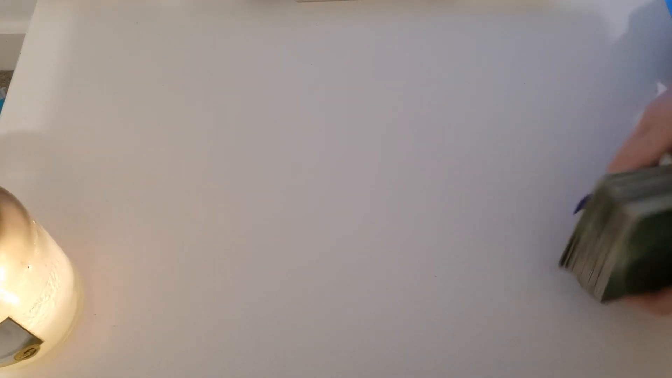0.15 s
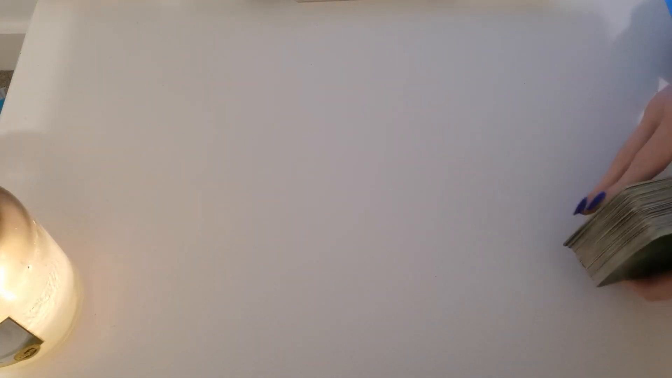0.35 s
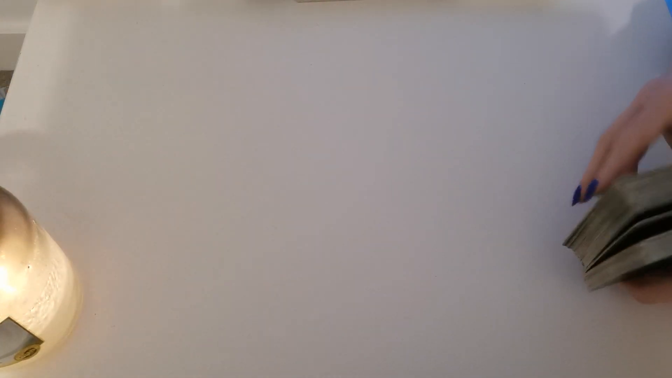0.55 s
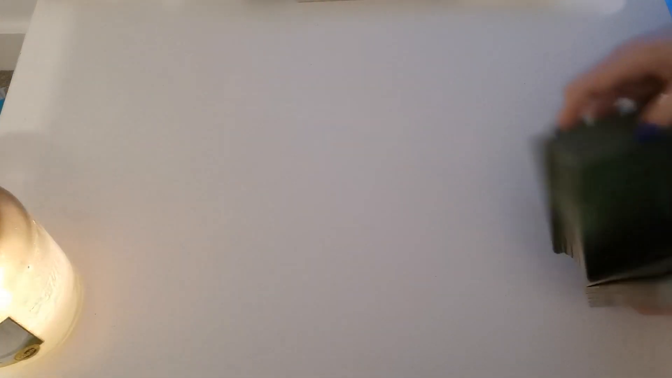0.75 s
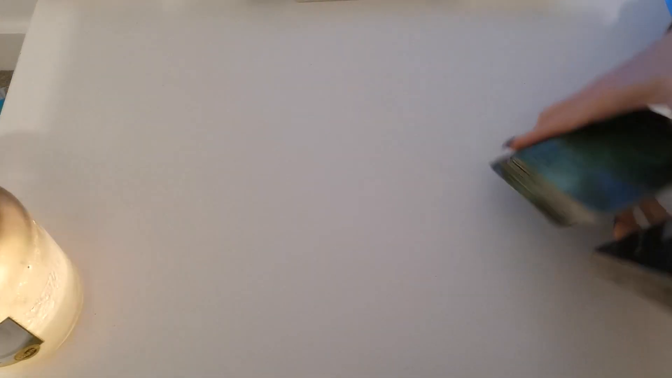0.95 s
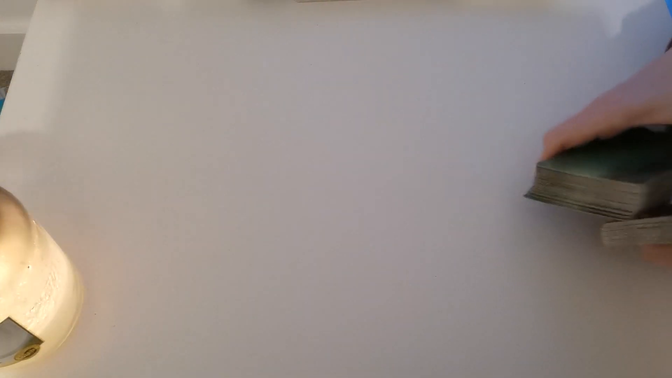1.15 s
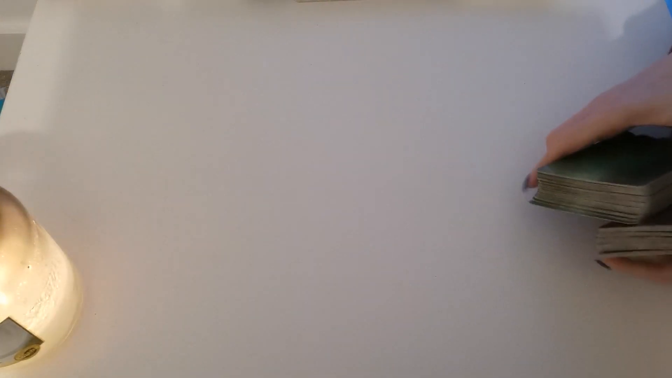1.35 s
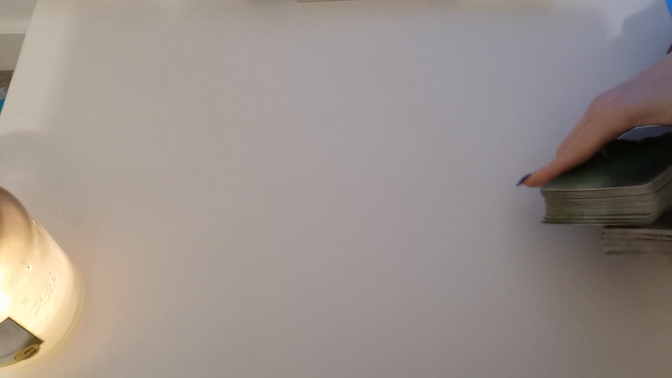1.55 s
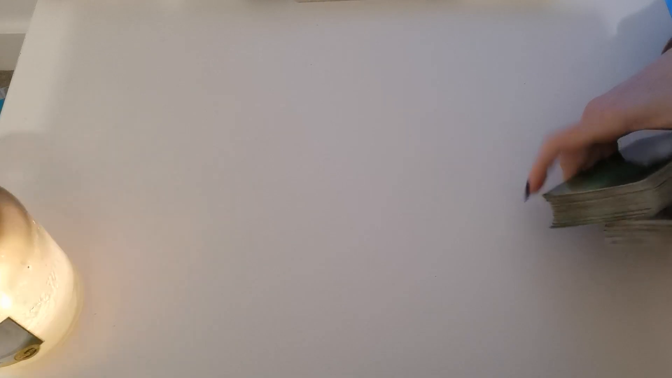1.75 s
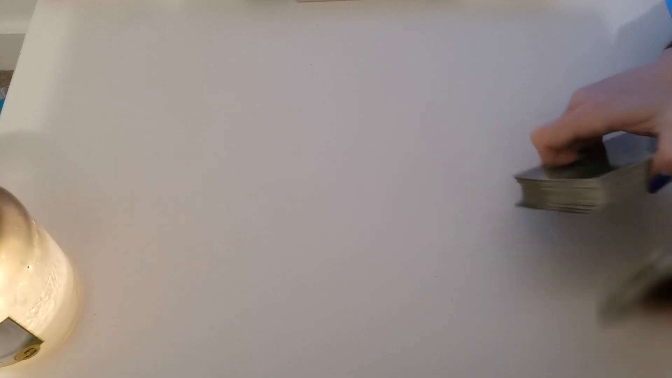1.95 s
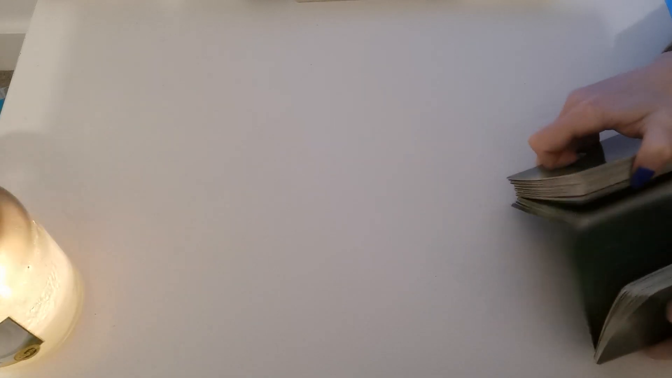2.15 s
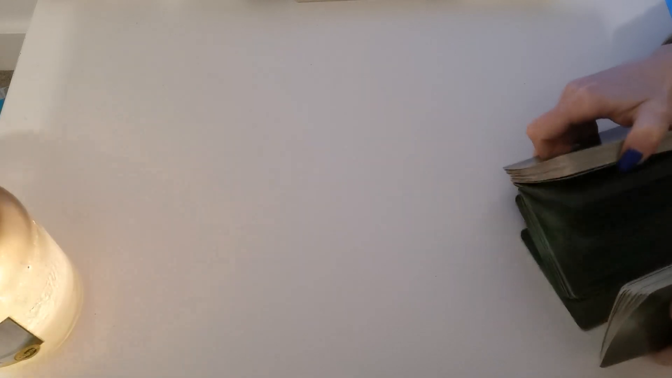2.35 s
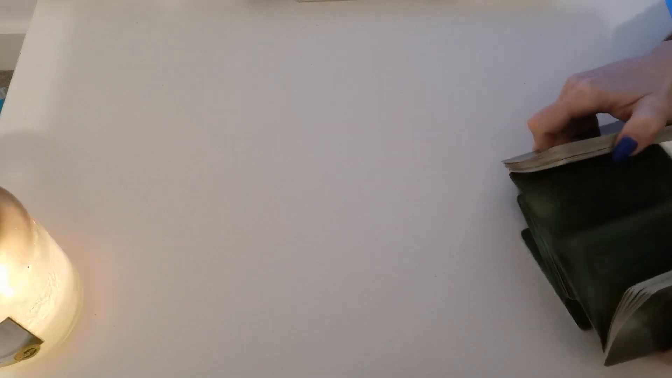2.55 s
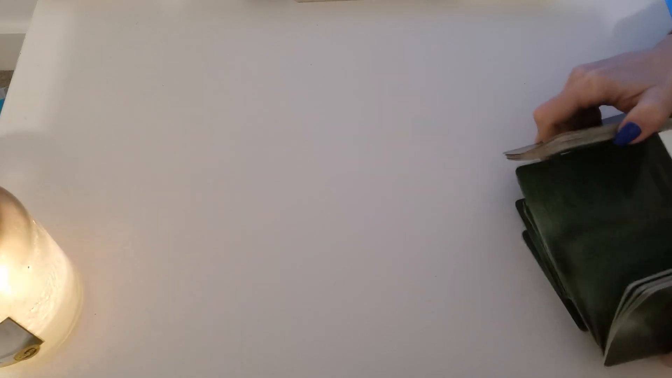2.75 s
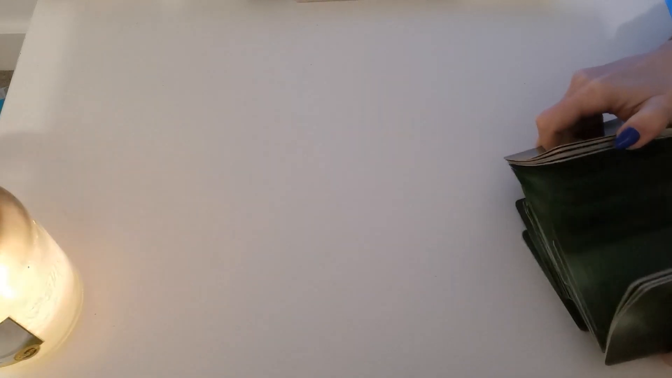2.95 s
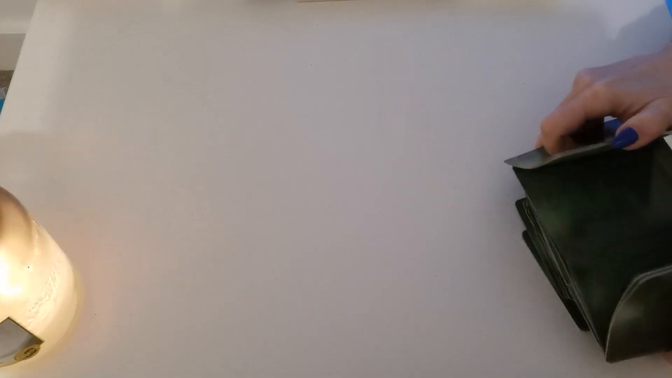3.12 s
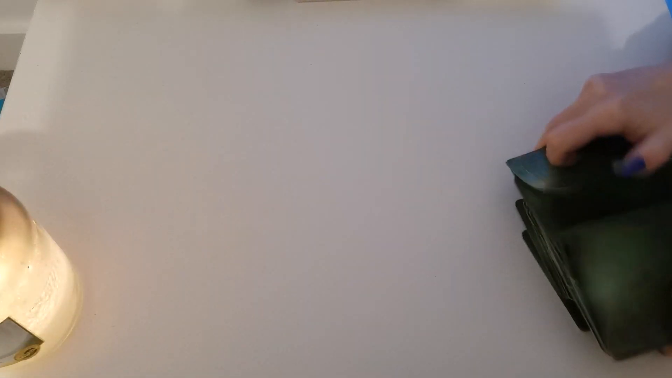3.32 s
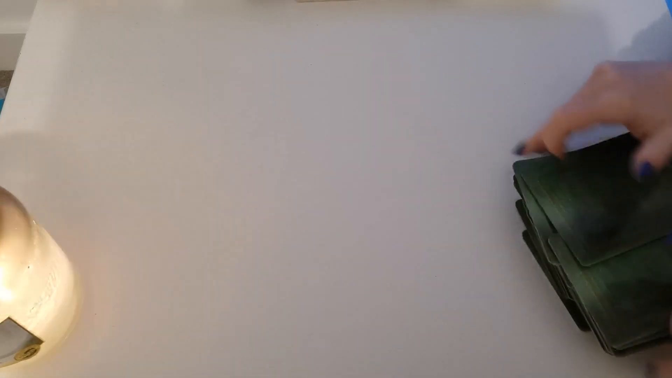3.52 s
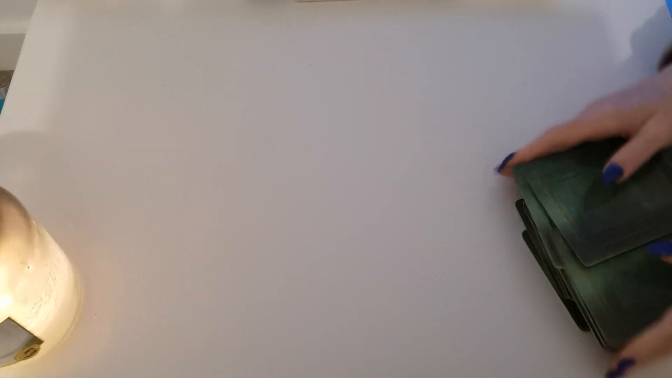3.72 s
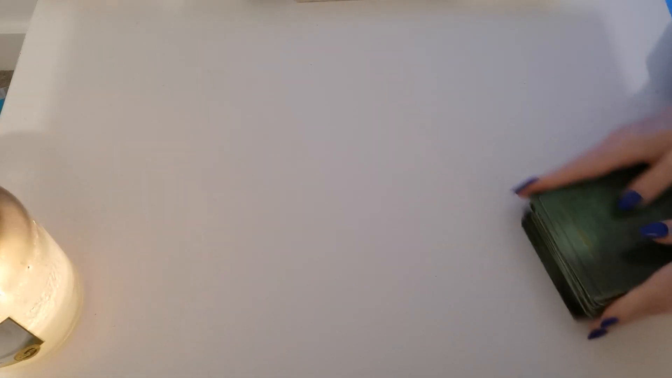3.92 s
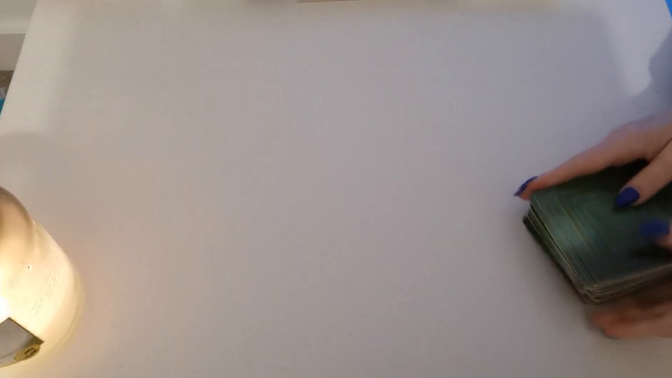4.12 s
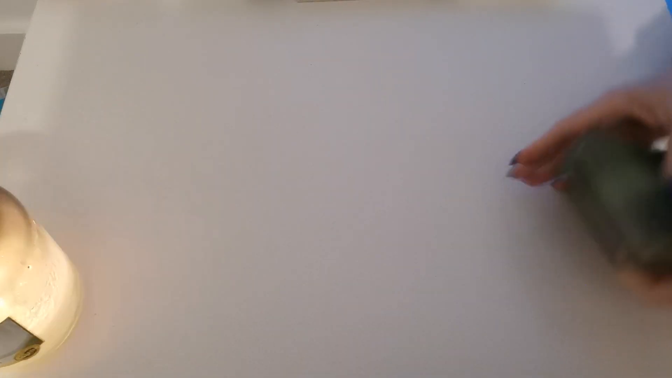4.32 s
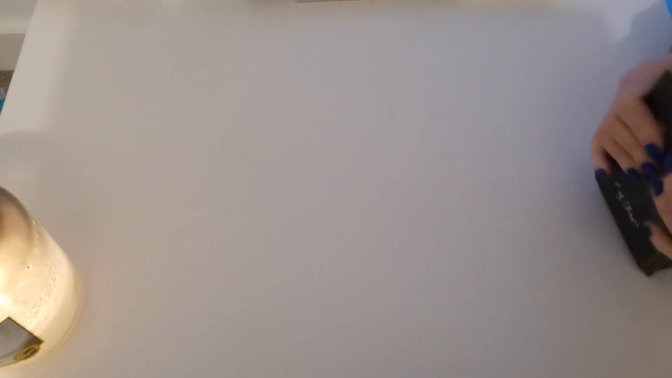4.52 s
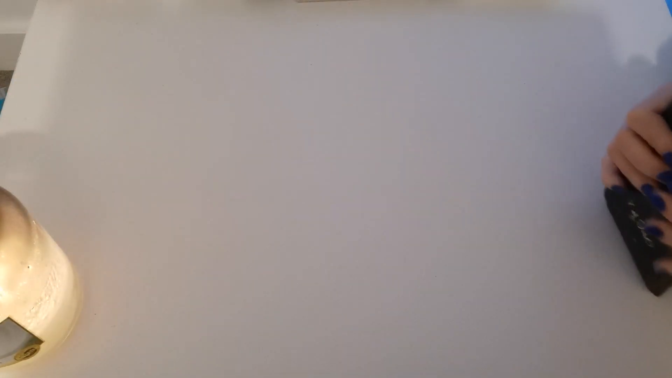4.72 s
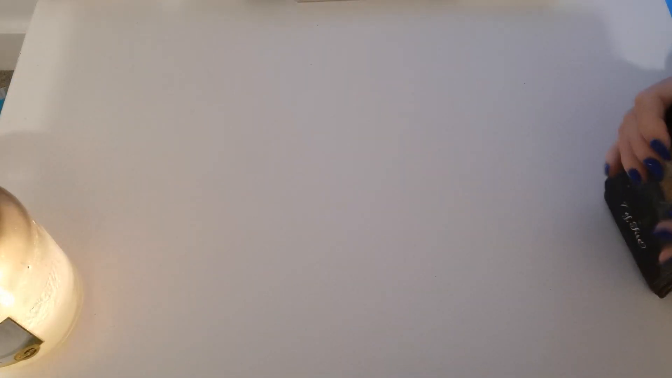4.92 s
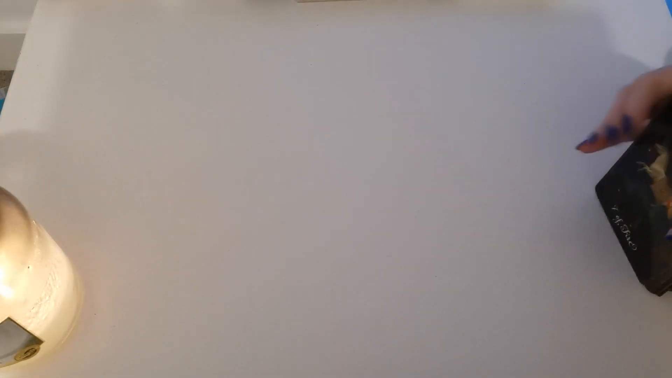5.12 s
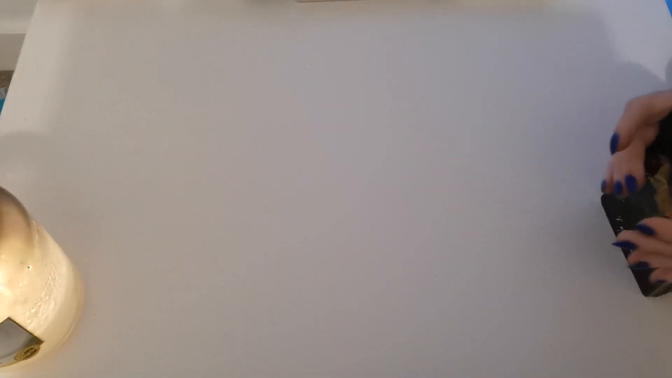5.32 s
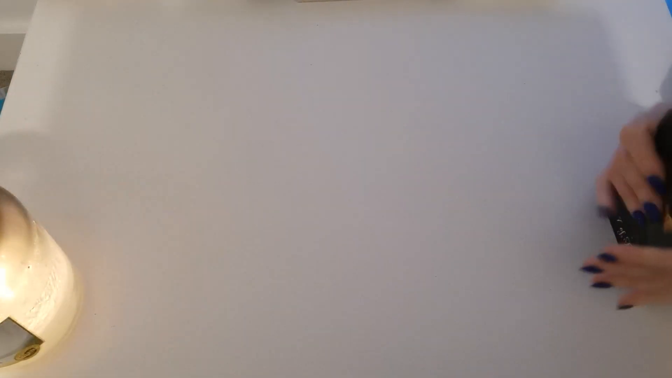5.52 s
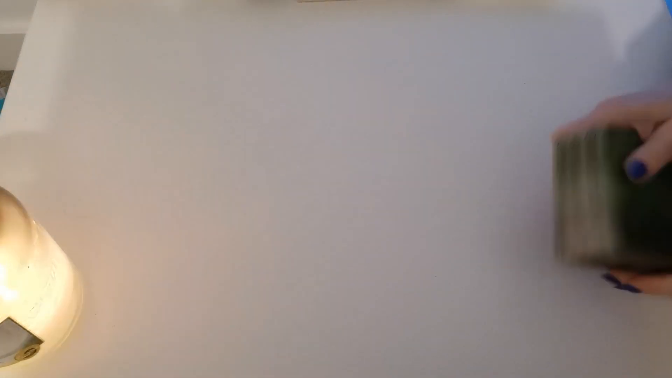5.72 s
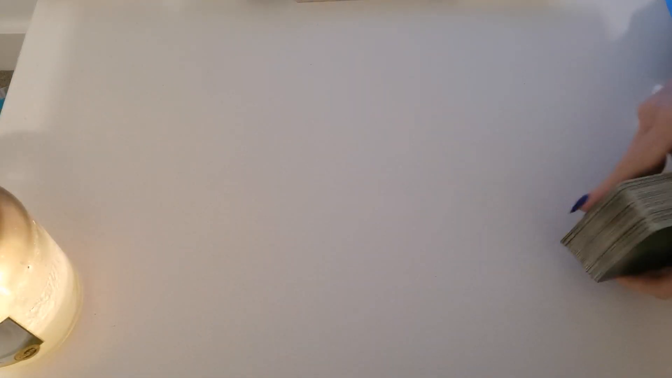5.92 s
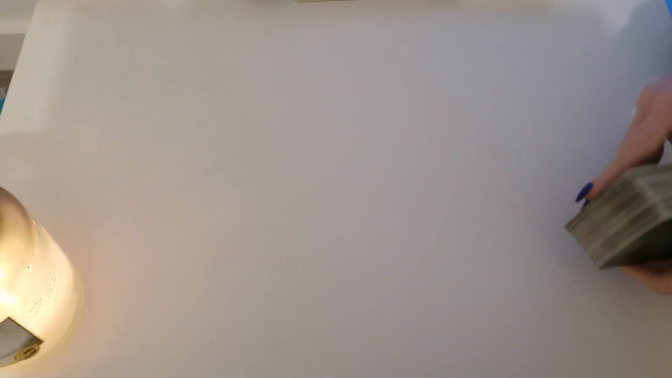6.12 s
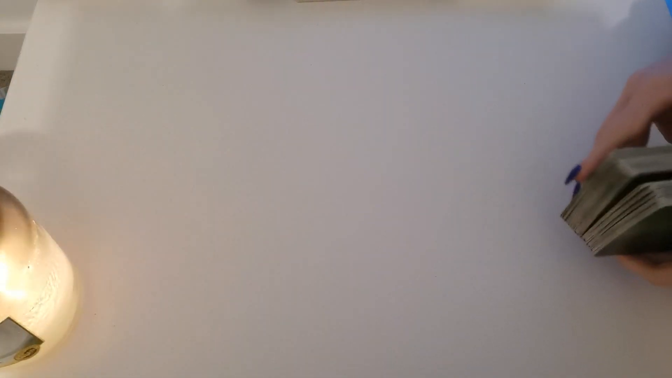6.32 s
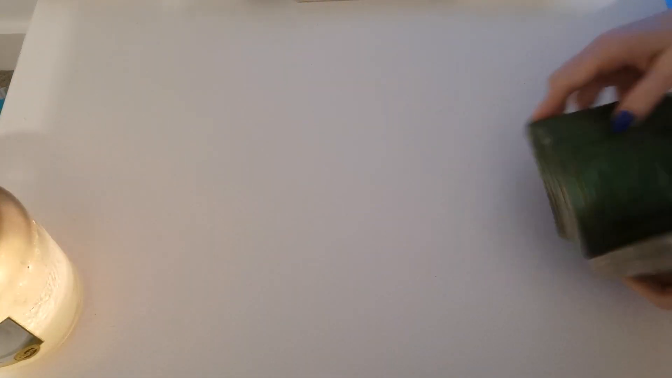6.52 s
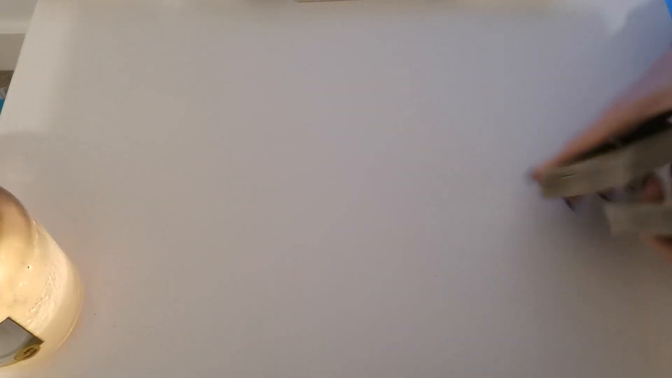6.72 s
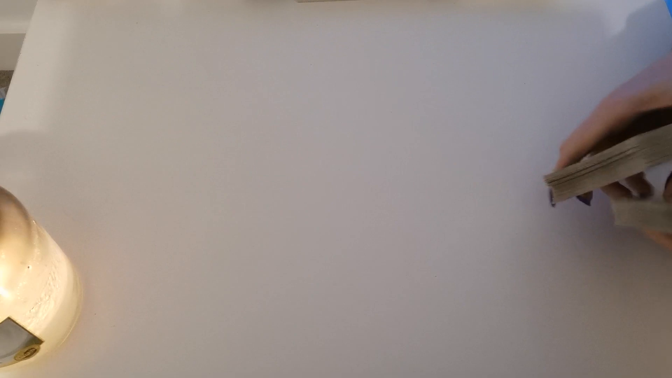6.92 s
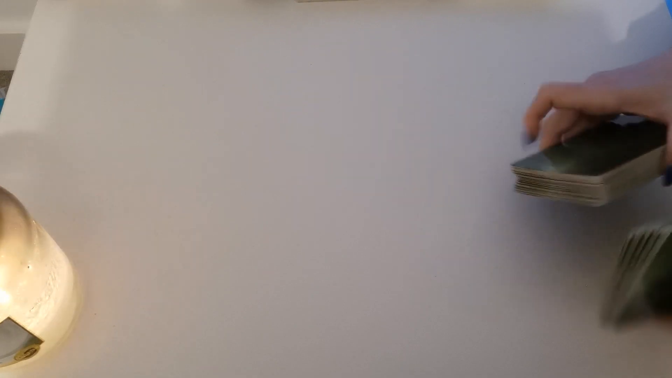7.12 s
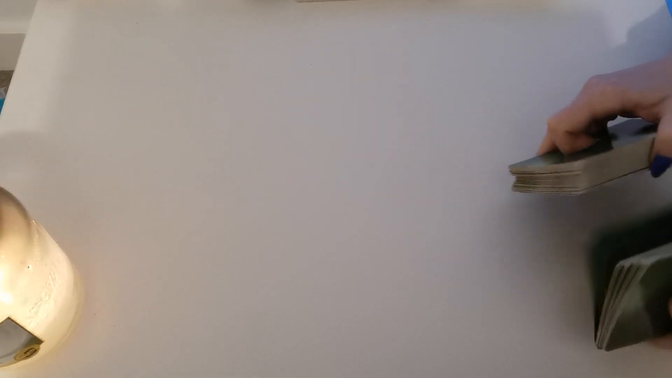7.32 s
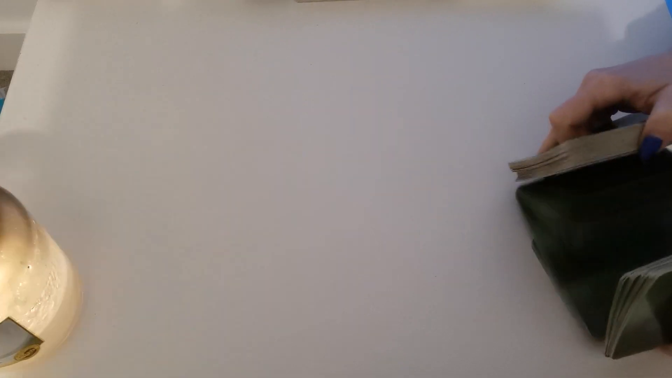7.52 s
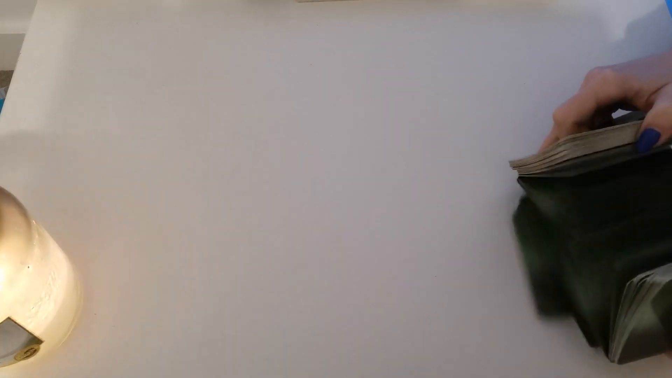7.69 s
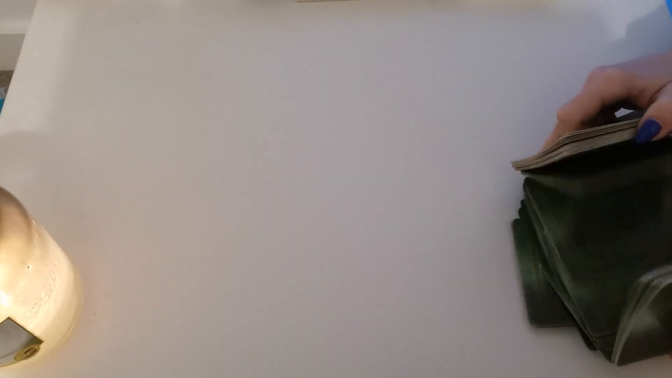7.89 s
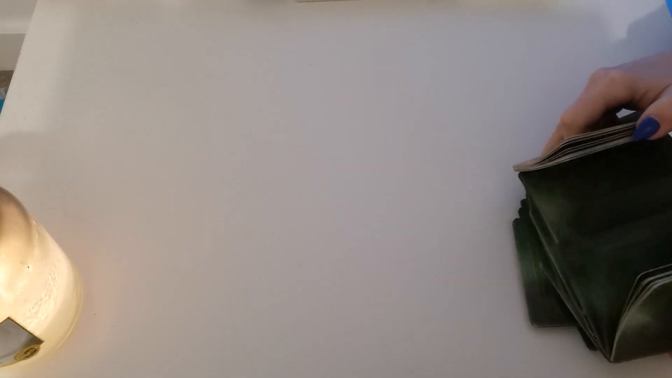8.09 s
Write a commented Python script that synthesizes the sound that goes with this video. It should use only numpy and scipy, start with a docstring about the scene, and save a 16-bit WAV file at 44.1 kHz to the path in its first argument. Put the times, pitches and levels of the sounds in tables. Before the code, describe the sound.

A deck of large, stiff cards is shuffled in a small quiet room, heard close in stereo, toward the right, over soft low rumble and faint hiss. From 0 to 2.3 s there are only very quiet rustles and tiny nail ticks, slightly clearer around 1.4-1.5. At about 2.35 packets begin dropping: a dense, uneven flurry of papery slaps, sharp edge snaps and light thumps, strong at 2.45, 2.9 and 3.2, thinning out by 3.6. Soft rasping slides and small clicks fill 3.7-4.5. From 4.6 to 5.4 the deck is knocked even in clusters of hollow, mid-pitched taps, firmest near 4.65, 4.9 and 5.1. Gentle rubbing and a light tap follow to 5.9. Near silence with faint brushes and ticks lasts until 7.5, when a second rattling flurry of slaps starts, peaking near 7.66 and 7.88 and fading after 8.1.

```python
"""A deck of large cards is cut, dropped in packets on a table, squared and knocked even, in a small quiet room.
Each blow is a click with a burst of tiny contacts, heard through the card body, corners, edges and table.
Sliding cards are swelling noise made of tiny contacts, with edge ticks and random claps of loose cards.
A short room tail, low rumble and microphone hiss are added; of two spaced microphones the right is nearer."""
import sys
import numpy as np
from scipy import signal
from scipy.fft import rfft, irfft, next_fast_len
from scipy.io import wavfile
from scipy.ndimage import uniform_filter1d

SR = 44100
rng = np.random.default_rng(int(sys.argv[2]) if len(sys.argv) > 2 else 0)


def persist_wave(psi):
    """Save psi, clipped to +-1, as 16-bit WAV."""
    counts = np.round(np.clip(psi, -1, 1) * 32767).astype(np.int16)
    wavfile.write(sys.argv[1], SR, np.atleast_2d(counts).T)


N = 359415      # length of the scene [samples]

# Blow levels are those of the contact click, and all source levels are before the room and microphones.
# packets land on the table or on each other: (time [s], card body [dB], edge snap [dB], table thump [dB])
SLAPS = [(1.142, -69, -70, -60), (2.357, -35, -32.5, -42), (2.3616, -32.5, -27.5, -34.5),
         (2.439, -21, -20, -27.5), (2.4471, -27, -31, -36), (2.5327, -45, -31.5, -46.5),
         (2.5441, -32.5, -63, -37), (2.5975, -43, -32.5, -70), (2.628, -36, -29, -50),
         (2.6531, -24, -26, -42), (2.664, -28, -24.5, -50), (2.7016, -42.5, -34, -88),
         (2.718, -28, -21.5, -47), (2.7305, -27.5, -34, -28.5), (2.7454, -35, -50, -42.5),
         (2.7911, -43.5, -32.5, -76), (2.8075, -42, -30.5, -64), (2.8306, -37, -29.5, -70),
         (2.8806, -17.5, -19, -40), (2.918, -36.5, -42, -64), (2.923, -22.5, -24, -36.5),
         (2.9416, -35, -23, -68), (3.0039, -33, -34, -43), (3.0584, -47.5, -37.5, -67),
         (3.074, -45.5, -34.5, -82), (3.103, -32, -25, -62.5), (3.1162, -47, -26, -55),
         (3.1332, -33, -25, -46), (3.1825, -28, -20.5, -53), (3.1974, -25.5, -13, -52.5),
         (3.2436, -31, -33, -51.5), (3.2838, -27, -16, -43), (3.3176, -47, -24, -54.5),
         (3.4242, -32, -22.5, -76), (3.4361, -24.5, -22.5, -53.5), (3.4667, -29.5, -26.5, -46),
         (3.4901, -58, -36, -75), (3.5413, -31.5, -23, -38), (3.5701, -34, -31.5, -54),
         (3.7125, -39, -32.5, -50), (4.2346, -39, -51.5, -78.5), (4.2495, -42, -33, -53),
         (4.2842, -61, -33, -61), (4.4173, -38, -31.5, -74.5), (5.92, -41, -46, -53.5),
         (7.5544, -29, -32, -41), (7.5637, -30.5, -40, -28.5), (7.5697, -23, -24.5, -48),
         (7.6228, -32.5, -27, -51), (7.6595, -19.5, -25.5, -39), (7.6656, -30, -27, -34),
         (7.726, -41, -46, -45), (7.7329, -34, -37, -38), (7.7376, -33.5, -36, -37),
         (7.8456, -36, -35.5, -46), (7.8597, -32.5, -40, -55), (7.8775, -18, -16.5, -42),
         (7.8813, -41, -21, -41), (7.9467, -25, -24, -37), (7.957, -31.5, -40, -51),
         (7.9638, -24, -24, -40), (7.9715, -26, -25, -51), (7.9996, -31, -32, -42), (8.0472, -42, -38, -73),
         (8.1224, -33, -41, -39.5)]
# fingers and nails tick on the deck held in the hands: (time [s], card body [dB], edge snap [dB])
TICKS = [(0.1856, -46.5, -45), (0.2948, -76, -47), (0.323, -70, -58), (0.359, -58, -52),
         (0.6844, -69, -47.5), (0.8573, -69, -47), (0.8804, -53, -38), (1.0027, -57, -40),
         (1.111, -60, -54), (1.4038, -48, -34), (1.4535, -48, -42.5), (1.5159, -38, -42.5),
         (1.599, -64, -54), (1.6455, -53, -58), (1.9515, -61, -49), (2.0885, -48.5, -46.5),
         (2.1796, -45.5, -47.5), (2.2198, -46, -55), (2.3016, -49, -43), (5.6549, -51, -36),
         (6.623, -53.5, -49.5), (6.955, -73, -47.5), (7.0043, -55, -52.5), (7.2356, -52.5, -57),
         (7.2863, -45, -44.5), (7.366, -52.5, -50.5), (7.4736, -46.5, -53), (7.5142, -51.5, -53)]
# the deck is knocked even on the table: (time [s], card body [dB], card corner [dB], table thump [dB])
KNOCKS = [(4.626, -20, -36, -30), (4.6346, -24.5, -55, -45), (4.6613, -16, -40, -27.5),
          (4.6698, -23, -38, -56.5), (4.7592, -42, -65, -36.5), (4.788, -50, -76, -45),
          (4.8507, -43, -54, -38), (4.8996, -31.5, -52, -56), (4.9067, -25.5, -51.5, -43),
          (4.9239, -19.5, -29, -35.5), (5.03, -44, -60, -41), (5.0362, -27.5, -42.5, -39.5),
          (5.0909, -18, -18, -34.5), (5.103, -20.5, -32, -34), (5.1285, -26.5, -34.5, -36.5),
          (5.1751, -32.5, -39.5, -41.5), (5.3505, -31, -35.5, -46), (5.3618, -28.5, -36.5, -40),
          (5.688, -41, -55, -44), (5.7016, -45, -48, -42)]
# strokes of card on card or finger on card:
# (start [s], length [s], card body rms [dB], surface rasp rms [dB], fine hiss rms [dB])
STROKES = [(0.064, 0.17, -70.5, -75, -69.5), (0.292, 0.022, -76, -88, -81), (0.353, 0.012, -83, -73.5, -56),
           (0.617, 0.041, -75.5, -70, -69.5), (0.879, 0.016, -69, -64.5, -59.5),
           (1.01, 0.034, -77, -76, -71), (1.088, 0.048, -78, -74, -70), (1.15, 0.051, -70.5, -82, -77),
           (1.237, 0.028, -68.5, -66.5, -59), (1.29, .07, -81, -77, -85), (1.37, 0.026, -70.5, -66.5, -63),
           (1.433, 0.013, -66, -87, -83), (1.517, 0.16, -73.5, -76, -71), (1.834, 0.047, -80.5, -77, -78),
           (1.945, 0.014, -76, -76, -71), (2.11, 0.19, -70.5, -77, -76.5), (2.416, 0.19, -66, -63, -64),
           (2.605, 0.21, -66, -64, -62), (2.91, .1, -64, -66, -61), (3.104, .06, -59, -62.5, -58),
           (3.17, 0.17, -58, -60, -65), (3.405, 0.18, -57.5, -58, -63), (3.74, .15, -68.5, -63, -61),
           (3.925, 0.15, -63, -61, -61), (4.145, .06, -66.5, -67.5, -75), (4.242, 0.064, -59.5, -55, -56.5),
           (4.412, 0.01, -58.5, -58.5, -61), (4.488, 0.031, -60, -57.5, -55.5),
           (4.567, 0.12, -85, -64, -62), (4.73, 0.11, -63.5, -73, -73), (4.87, 0.091, -61, -63.5, -66),
           (5.021, 0.18, -54, -71, -70.5), (5.342, 0.057, -60, -65, -64.5),
           (5.43, 0.032, -69.5, -73.5, -69), (5.514, 0.23, -70.5, -63.5, -62.5),
           (5.653, .17, -69.5, -64.5, -63), (5.915, 0.02, -58, -62, -60.5),
           (6.227, 0.058, -89.5, -82.5, -74.5), (6.63, 0.011, -70, -72, -67),
           (6.773, 0.1, -69, -72.5, -66.5), (6.896, 0.072, -78.5, -74, -74),
           (7.026, 0.022, -71, -64.5, -67.5), (7.108, 0.058, -80, -72.5, -68.5),
           (7.27, .25, -75, -81.5, -81.5), (7.572, 0.17, -63.5, -59.5, -59.5),
           (7.829, 0.18, -59.5, -58, -64), (8.08, .07, -65, -62, -67)]
# the deck or a hand is pushed along the table top: (start [s], length [s], table rms [dB])
PUSHES = [(2.73, 0.026, -53), (4.02, 0.06, -64.5), (4.75, 0.071, -54.5), (5.41, 0.056, -59),
          (5.685, 0.026, -48.5), (7.73, 0.04, -54.5)]

# tone of the card body: (frequency [Hz], relative level [dB])
BODY = [(200, -43), (400, -10), (600, 2), (950, 5.5), (1400, 0), (2000, -16.5), (4000, -65)]
# tone of a held packet under rubbing: (frequency [Hz], relative level [dB])
RUBBED = [(250, -42), (500, -12.5), (700, -3.5), (950, 2.5), (1250, -4.5), (1800, -13), (3500, -37.5)]
# tone of the card corners: (frequency [Hz], relative level [dB])
CORNER = [(600, -39), (1300, -5), (1900, 0.5), (2500, 0), (3200, -9), (4500, -20.5), (8000, -35)]
# tone of the edge snap and the surface rasp: (frequency [Hz], relative level [dB])
RASP = [(1500, -43), (3200, -2), (4700, 1.5), (6800, 2), (8500, -5), (11000, -38.5)]
# tone of the fine hiss: (frequency [Hz], relative level [dB])
HISS = [(5000, -33), (8500, -5.5), (10800, 0.5), (12500, -3.5), (14000, -13), (16000, -20)]
# ringing of a packet: (frequency [Hz], relative level [dB], time to fall 60 dB [s])
PACKET = [(549, 10, 0.031), (687, 20.5, 0.012), (835, -8, 0.024), (941, -7, 0.017), (1148, -11, 0.027),
          (1296, -0.5, 0.024)]
# ringing of the table: (frequency [Hz], relative level [dB], time to fall 60 dB [s])
TABLE = [(127, -17.5, 0.07), (149.4, 2.5, 0.13), (209, -2, 0.078), (268, 9.5, 0.025), (331, 1, 0.064),
         (343, -8, 0.045)]

# room tail: (frequency [Hz], time to fall 60 dB [s])
ROOM = [(100, 0.38), (500, .22), (1500, 0.23), (5000, 0.21), (14000, 0.17)]
# room tail against the direct sound: (frequency [Hz], level [dB])
ROOM_LEVEL = [(100, -4), (1000, -4), (4000, -3.5), (14000, -11)]
# how alike the room tail is on both sides: (frequency [Hz], left-right likeness [0 to 1])
LIKENESS = [(100, 0.57), (400, 1), (1000, 0.34), (2000, 0.15), (10000, 0.08)]
# tone difference of the two microphones: (frequency [Hz], left minus right [dB])
BALANCE_DB = [(60, 5.5), (200, 8), (500, 4.5), (2000, 4.5), (5000, 3), (14000, 0)]
# where the hands are: (time [s], left minus right [dB])
HANDS = [(0.0, -6), (0.5, -8), (1.9, -7), (2.79, -5.5), (5.13, -2.5), (6.42, -6), (8.15, -2.5)]
# tone of the rumble and hiss: (frequency [Hz], relative level per Hz [dB])
QUIET = [(15, -9), (32, -10), (43, 0.5), (56, -18), (120, -20.5), (300, -25.5), (700, -31.5), (2000, -37),
         (4000, -40), (8000, -47.5), (10500, -41), (13000, -42.5), (16000, -41.5)]
# how alike the rumble and hiss are on both sides: (frequency [Hz], left-right likeness [0 to 1])
QUIET_LIKENESS = [(45, .85), (130, .5), (640, .2), (1400, 0.02), (15000, 0.01)]

QUIET_DB = -65.5      # rms of rumble and hiss together
CUTOFF_HZ = 15850
LEFT_LAG_S, LAG_SCATTER_S = .00014, .00005      # sound reaches the left microphone later
TICK_TABLE_DB = -20.5      # table part of a tick, against its card body part
RUB_TABLE_DB = -9      # table part of rubbing, against its card body part
CORNER_SHARE, CORNER_DB = 0.82, 0.5      # corners lie between body and edge: share of the body, lift
KNOCK_EDGE_DB = -19.5      # a knock's edge snap against its corner
RISE_DB_PER_S, FALL_DB_PER_S = 352.5, 254      # a stroke swells before its start and fades after its end
HISS_STEEPER = 1.2      # the fine hiss comes and goes this much faster
FLUTTER_PER_S, FLUTTER_FULL_DB = 70, -60.5      # clap rate; strokes weaker than this shake fewer cards loose
FLUTTER_BODY_DB, FLUTTER_CORNER_DB = 21, 19      # clap levels over the stroke's level


def from_db(db):
    """Turn decibels into an amplitude factor."""
    return 10 ** (np.asarray(db) / 20)


def rms_one(x):
    """Scale a sound to an rms of one."""
    return x / np.sqrt(np.mean(x ** 2) + 1e-20)


def at_hz(points, hz):
    """Read a table at any pitch, in a straight line over log frequency."""
    table_hz, values = np.array(points).T[:2]
    return np.interp(np.log(hz + 1), np.log(table_hz), values)


def convolve(x, h):
    """Let every tiny contact in x set off the response h."""
    return signal.fftconvolve(x, np.broadcast_to(h, x.shape[:-1] + h.shape[-1:]), axes=-1)[..., :N]


def causal(points, size=4096):
    """Minimum-phase response of a spectrum, by folding its cepstrum; unit energy."""
    cep = irfft(at_hz(points, np.fft.rfftfreq(size, 1 / SR)) * np.log(10) / 20)
    cep[1:size // 2] *= 2
    cep[size // 2 + 1:] = 0
    h = irfft(np.exp(rfft(cep)))
    return h / np.sqrt(np.sum(h ** 2))


def ringing(modes, low_hz):
    """Response of struck modes, each a dying sine, weakened below low_hz; unit energy."""
    t = np.arange(SR // 3) / SR
    h = sum(from_db(db - 60 * t / t60) * np.sin(2 * np.pi * hz * t) for hz, db, t60 in modes)
    h = signal.sosfilt(signal.butter(3, low_hz, "high", fs=SR, output="sos"), h)
    return h / np.sqrt(np.sum(h ** 2))


def pair(size, likeness):
    """Spectra of left and right noise whose likeness depends on pitch."""
    mid, side = rfft(rng.standard_normal((2, size)))
    alike = np.clip(at_hz(likeness, np.fft.rfftfreq(size, 1 / SR)), 0, 1)
    shared = np.sqrt(1 + alike) * mid
    opposed = np.sqrt(1 - alike) * side
    return (shared + opposed * [[1], [-1]]) / np.sqrt(2)


def uneven(shape, spread_db):
    """Sizes of small contacts: mostly alike, a few larger."""
    return from_db(spread_db * np.minimum(rng.exponential(1, shape), 4))


def left_later(x):
    """The same sound on both sides, reaching the left a moment later."""
    return np.array([np.roll(x, round(LEFT_LAG_S * SR)), x])


def coloured(x):
    """Each microphone has its own tone: the left is lifted against the right, least at the very top."""
    sides = [causal([(hz, side * db / 2) for hz, db in BALANCE_DB], size=1024) for side in (1, -1)]
    return convolve(x, np.array(sides))


def quiet():
    """Low rumble of the building and the microphones' hiss: steady noise shaped by pitch."""
    size = next_fast_len(N)
    colour = from_db(at_hz(QUIET, np.fft.rfftfreq(size, 1 / SR)))
    noise = irfft(pair(size, QUIET_LIKENESS) * colour, size)[:, :N]
    return from_db(QUIET_DB) * rms_one(coloured(noise))


def swells(rows, steep):
    """Each level column in time: swell, hold, fade; overlapping strokes add in power."""
    t = np.arange(0, N, 64) / SR
    start, length, *levels_db = np.transpose(rows)
    before = np.maximum(start - t[:, None], 0)
    after = np.maximum(t[:, None] - start - length, 0)
    shape_db = -RISE_DB_PER_S * before - FALL_DB_PER_S * after
    # doubling the dB turns amplitude into power
    powers = [from_db(2 * k * shape_db) @ from_db(2 * db) for k, db in zip(steep, levels_db)]
    return [np.interp(np.arange(N) / SR, t, 10 * np.log10(p + 1e-14)) for p in powers]


def stroke_levels():
    """Body, rasp and hiss levels of the strokes over time."""
    return swells(STROKES, (1, 1, HISS_STEEPER))


def sliding(body, corner, rasp, hiss, table):
    """Dense uneven micro-contacts in clumps; fine ones spread over the cards reach each side differently."""
    body_db, rasp_db, hiss_db = stroke_levels()
    table_db = np.maximum(body_db + RUB_TABLE_DB, swells(PUSHES, (1,))[0])
    corner_db = (body_db + rasp_db) / 2 - 2.0      # corners scrape when the cards both bend and rub
    clumps = np.repeat(rng.standard_normal(N // 200 + 2), 200)
    clumps = rms_one(uniform_filter1d(clumps, size=300))[:N]
    # level over time, response, how much the two sides differ
    layers = [(body_db, body, .4), (corner_db, corner, .6), (rasp_db, rasp, .8),
              (hiss_db, hiss, .8), (table_db, table, .1)]
    out = 0
    for level_db, response, spread in layers:
        noise = rng.standard_normal((3, N)) * uneven(N, spread_db=3.0) * from_db(2.0 * clumps)
        shared, own = noise[0], noise[1:]
        grains = np.sqrt(1 - spread ** 2) * left_later(shared) + spread * own
        out = out + convolve(rms_one(grains) * from_db(level_db), response)
    return out


def flicks():
    """Single card edges catch and let go while sliding, each a tick at one of eight pitches."""
    _, rasp_db, _ = stroke_levels()
    is_caught = rng.random(N) < 120 / SR      # 120 a second on average
    caught = is_caught * uneven(N, spread_db=4.5) * rng.choice([-1, 1], N)
    caught *= from_db(rasp_db + 8.0)
    pitch_number = rng.integers(0, 8, N)
    t, out = np.arange(SR // 100) / SR, 0
    for k, hz in enumerate(np.geomspace(2500, 9000, 8)):
        ring = from_db(-60 * t * hz / 7) * np.sin(2 * np.pi * hz * t)      # falls 60 dB in seven cycles
        out = out + convolve(caught * (pitch_number == k), ring)
    return left_later(out)


def flutter(body, corner):
    """Loose cards clap together at random while they slide, each clap with its own mix of body and corner."""
    body_db, rasp_db, _ = stroke_levels()
    chance = FLUTTER_PER_S / SR * from_db(np.minimum(body_db - FLUTTER_FULL_DB, 0))
    claps = (rng.random(N) < chance) * rng.choice([-1, 1], N) * uneven((2, N), spread_db=2.5)
    body_claps = claps[0] * from_db(body_db + FLUTTER_BODY_DB)
    corner_claps = claps[1] * from_db((body_db + rasp_db) / 2 + FLUTTER_CORNER_DB)
    return left_later(convolve(body_claps, body) + convolve(corner_claps, corner))


def contacts():
    """All blows as (time [s], body [dB], corner [dB], edge [dB], table [dB])."""
    blows = []
    ticks = [(s, body_db, edge_db, body_db + TICK_TABLE_DB) for s, body_db, edge_db in TICKS]
    for s, body_db, edge_db, table_db in list(SLAPS) + ticks:
        corner_db = CORNER_SHARE * body_db + (1 - CORNER_SHARE) * edge_db + CORNER_DB
        blows.append((s, body_db, corner_db, edge_db, table_db))
    for s, body_db, corner_db, table_db in KNOCKS:
        blows.append((s, body_db, corner_db, corner_db + KNOCK_EDGE_DB, table_db))
    return blows


def slaps(body, corner, rasp, hiss, table):
    """Each blow is a contact click, its echo off the table and a dying flutter of smaller contacts."""
    size, lead = SR // 14, SR // 400      # samples per blow, and how many come before contact
    t = (np.arange(size) - lead) / SR
    blows = contacts()
    out = np.zeros((5, 2, N + 2 * size))      # five parts, two sides
    small_contacts = rng.standard_normal((len(blows), 5, size)) * uneven((len(blows), 1, size), spread_db=4.0)
    chance = rng.random((len(blows), 4))
    # air squeezed out just before contact, then a quick decay
    envelope = from_db(np.where(t > 0, -60 * t / 0.035, 60 * t / 0.0066))
    for blow, grains, (echo, sign, place, crisp) in zip(blows, small_contacts, chance):
        s, body_db, corner_db, edge_db, table_db = blow
        force = grains * envelope
        force *= from_db(2.0) / np.sqrt(np.sum(force ** 2, axis=1, keepdims=True))
        force[:, lead] = -1      # the click
        force[:, lead + 4 + int(echo * .0012 * SR)] += .5 * (2 * sign - 1)
        hiss_db = edge_db - 9.0 + 3.9 * crisp
        force *= from_db([body_db, corner_db, edge_db, hiss_db, table_db])[:, None]
        lag_s = LEFT_LAG_S + LAG_SCATTER_S * (4 * place - 2)      # each packet lands elsewhere
        lag = max(round(lag_s * SR), 0)
        for side, at in enumerate(round(s * SR) + np.array([lag, 0])):
            out[:, side, at:at + size] += force
    parts = zip(out[..., lead:], (body, corner, rasp, hiss, table))
    return sum(convolve(force, h / np.abs(h).max()) for force, h in parts)


def at_microphones(x):
    """Direct sound plus a diffuse tail that dies band by band; each side has its own colour."""
    size = SR // 2
    hz, t = np.fft.rfftfreq(size, 1 / SR), np.arange(size) / SR
    noise = pair(size, LIKENESS) * from_db(at_hz(ROOM_LEVEL, hz))
    tail = 0
    for centre in 60 * 2 ** np.arange(9):      # overlapping bands, an octave apart
        band = np.cos(np.pi / 2 * np.clip(np.log2((hz + 1) / centre), -1, 1)) ** 2
        t60 = at_hz(ROOM, centre)
        energy = t60 * SR / np.log(10 ** 6)      # keeps long and short tails equally strong
        tail = tail + irfft(noise * band) * from_db(-60 * t / t60) / np.sqrt(energy)
    tail = tail * np.clip(t / 0.003, 0, 1)      # first reflections take a moment
    pan_db = np.interp(np.arange(N) / SR, *np.transpose(HANDS))
    return coloured((x + convolve(x, tail)) * from_db(pan_db * [[.5], [-.5]]))


def scene():
    """Sliding, flicks, flutter and blows in the room, over the quiet background."""
    body = causal(BODY, size=2 ** 14)[:SR // 3] + from_db(-12.5) * ringing(PACKET, low_hz=375)
    corner, rasp, hiss = causal(CORNER), causal(RASP), causal(HISS)
    # light rubbing stirs the deepest table modes less
    rubs = sliding(causal(RUBBED), corner, rasp, hiss, ringing(TABLE, low_hz=167))
    hits = slaps(body, corner, rasp, hiss, ringing(TABLE, low_hz=104))
    return at_microphones(rubs + flicks() + flutter(body, corner) + hits) + quiet()


def record(dry):
    """Cut the top steeply with an elliptic low-pass filter."""
    return signal.sosfilt(signal.ellip(10, .5, 60, CUTOFF_HZ, fs=SR, output="sos"), dry)


dry = scene()
out = record(dry)
persist_wave(out)
```